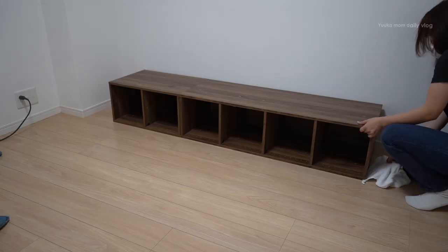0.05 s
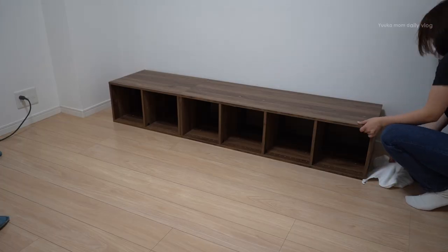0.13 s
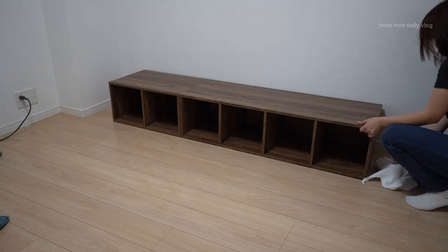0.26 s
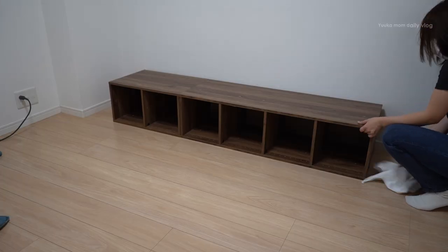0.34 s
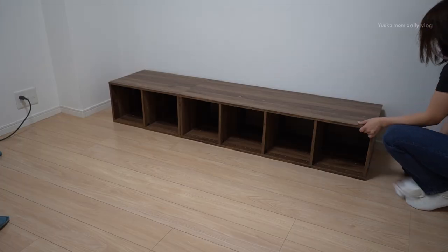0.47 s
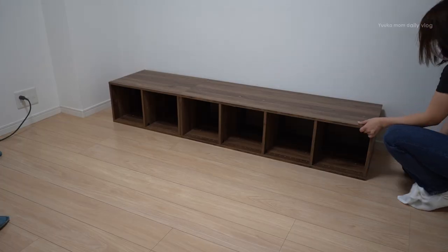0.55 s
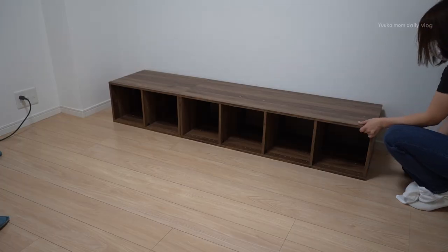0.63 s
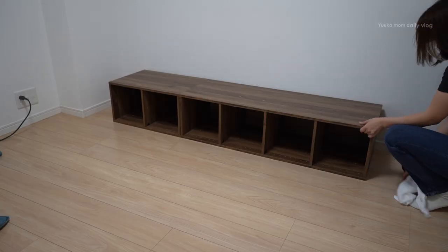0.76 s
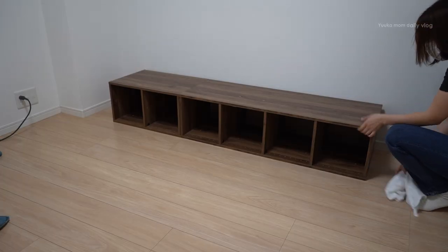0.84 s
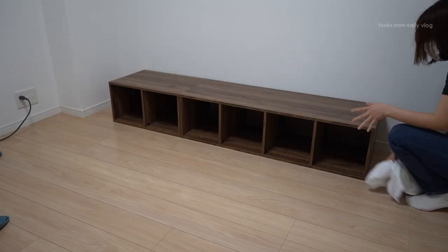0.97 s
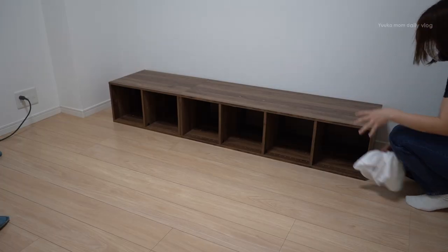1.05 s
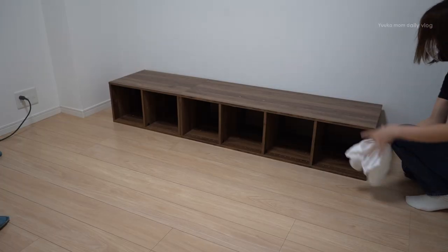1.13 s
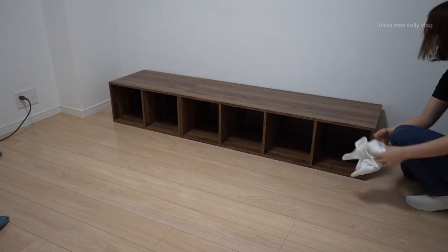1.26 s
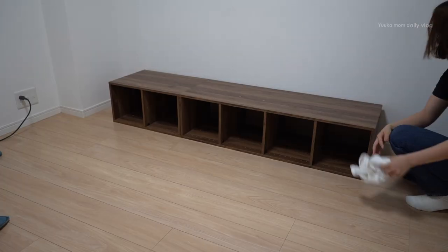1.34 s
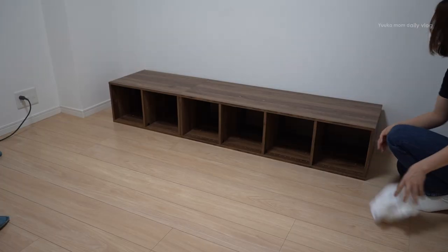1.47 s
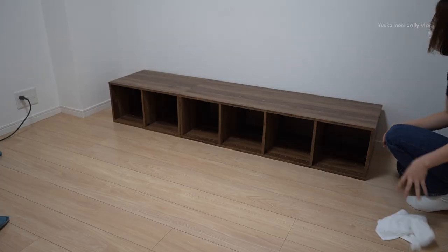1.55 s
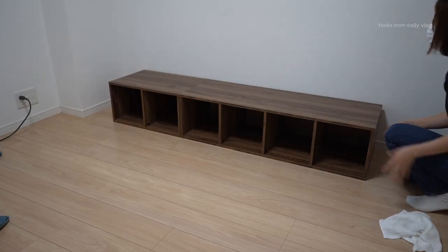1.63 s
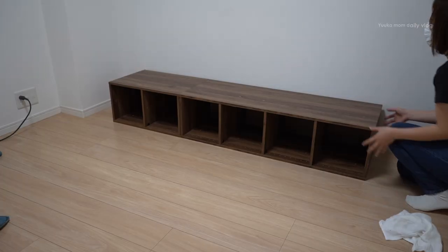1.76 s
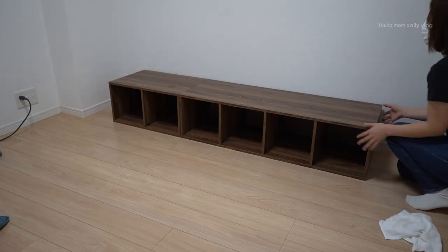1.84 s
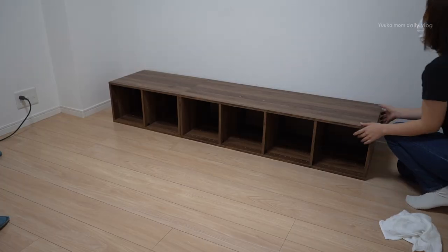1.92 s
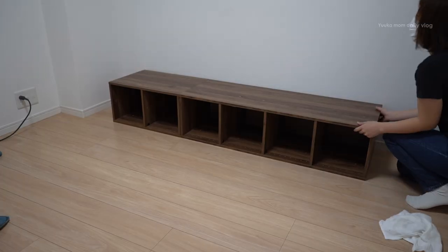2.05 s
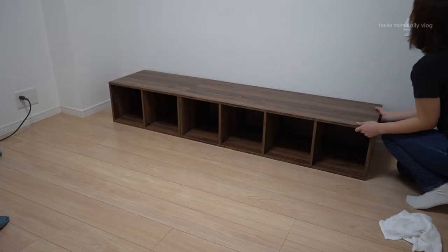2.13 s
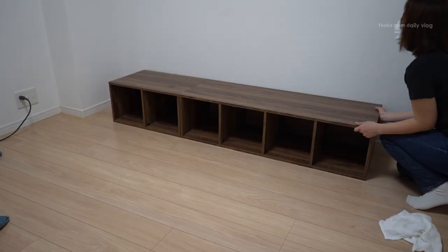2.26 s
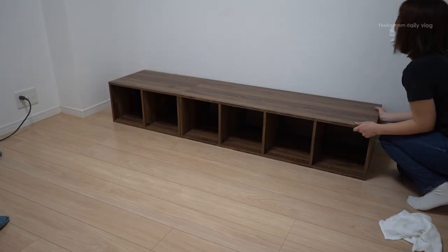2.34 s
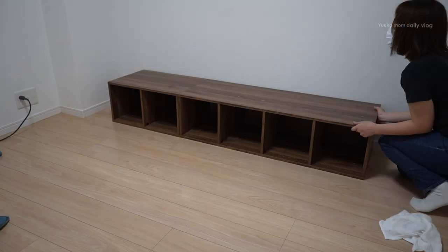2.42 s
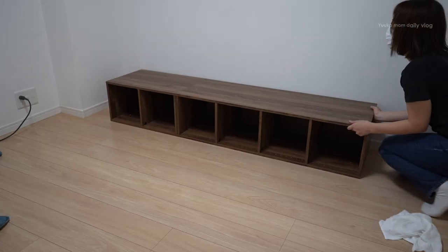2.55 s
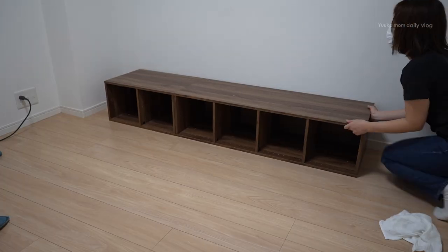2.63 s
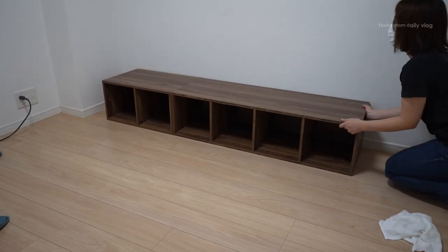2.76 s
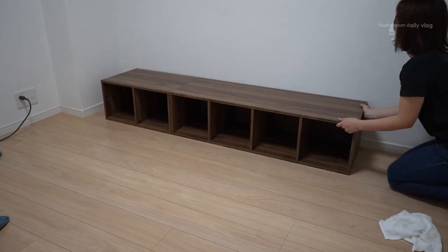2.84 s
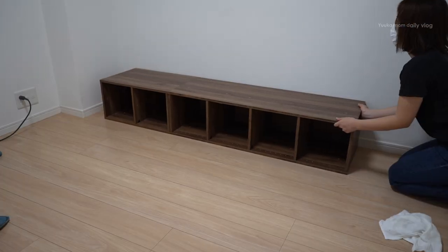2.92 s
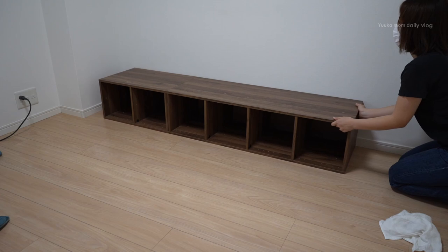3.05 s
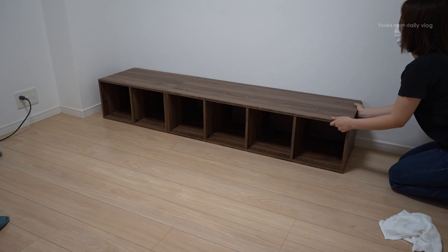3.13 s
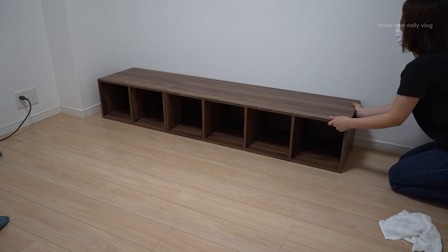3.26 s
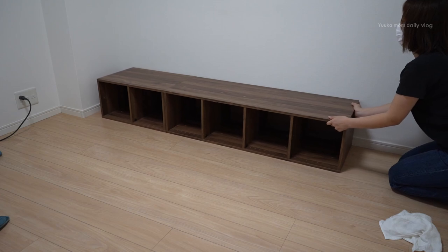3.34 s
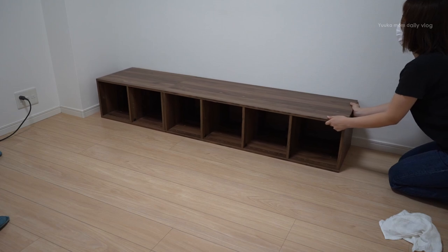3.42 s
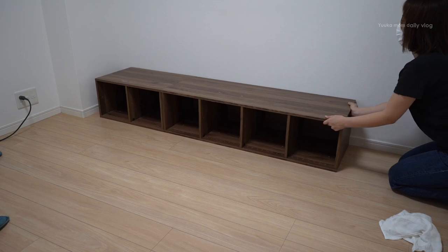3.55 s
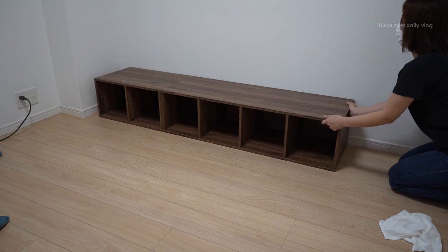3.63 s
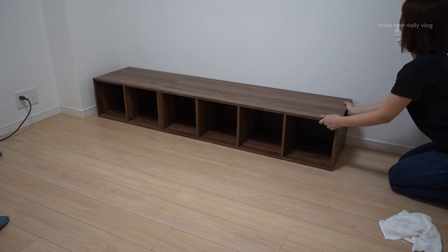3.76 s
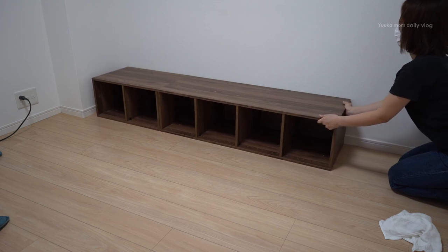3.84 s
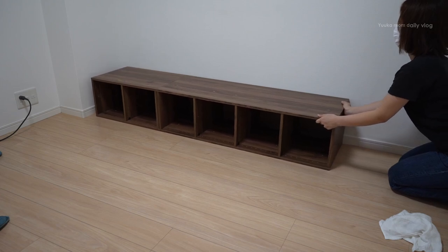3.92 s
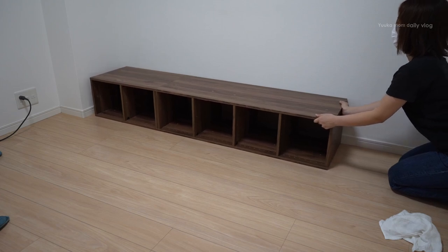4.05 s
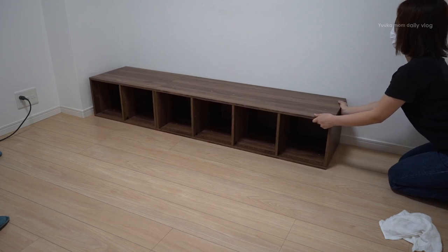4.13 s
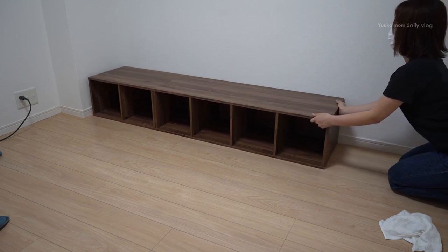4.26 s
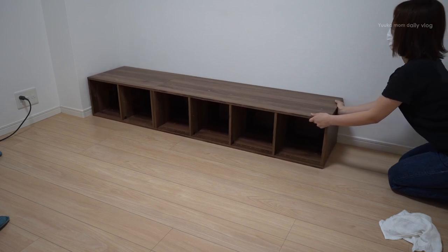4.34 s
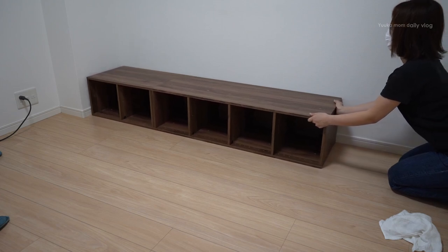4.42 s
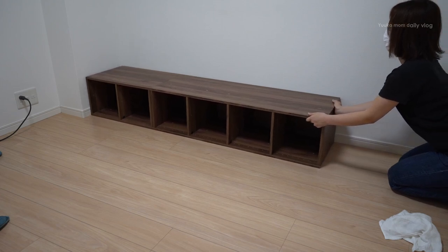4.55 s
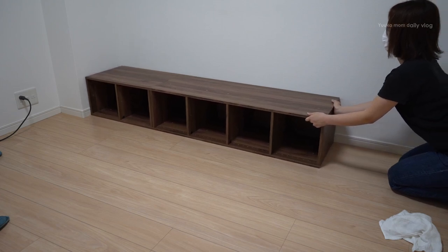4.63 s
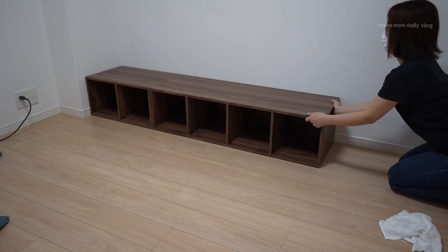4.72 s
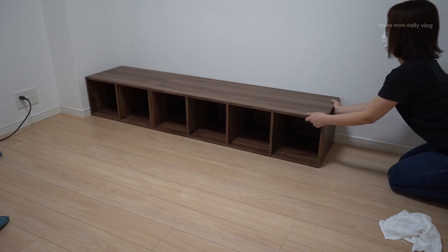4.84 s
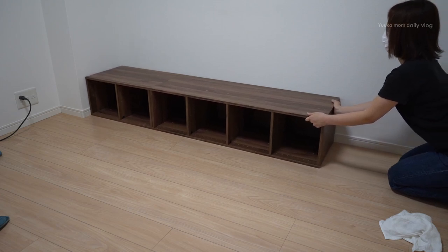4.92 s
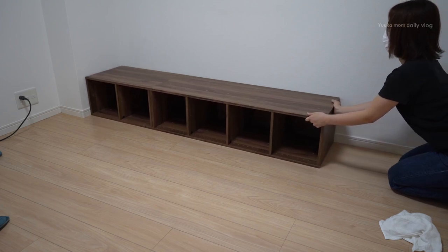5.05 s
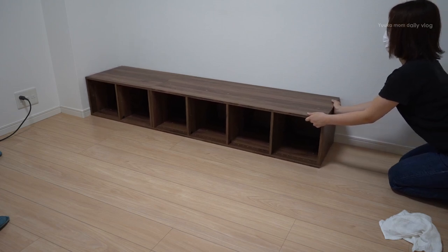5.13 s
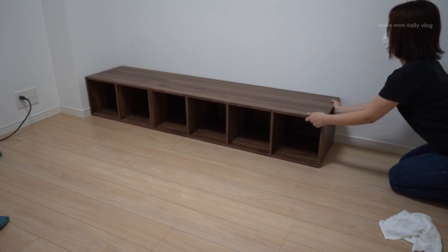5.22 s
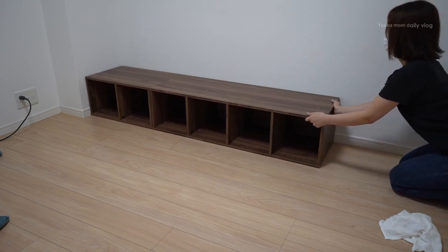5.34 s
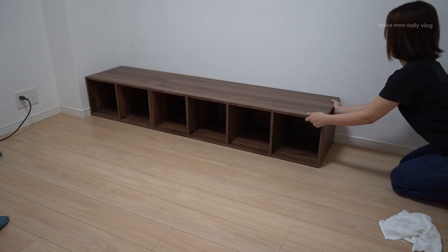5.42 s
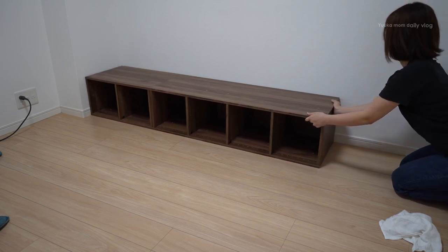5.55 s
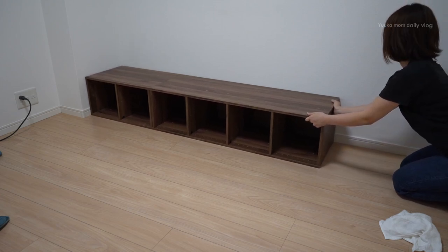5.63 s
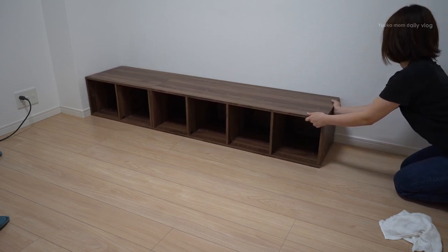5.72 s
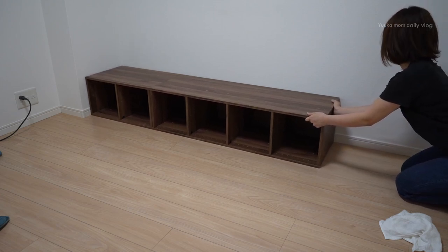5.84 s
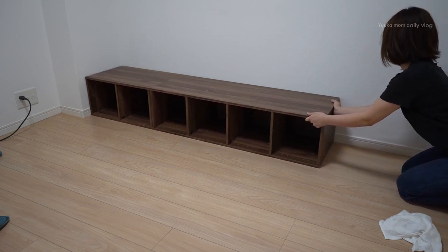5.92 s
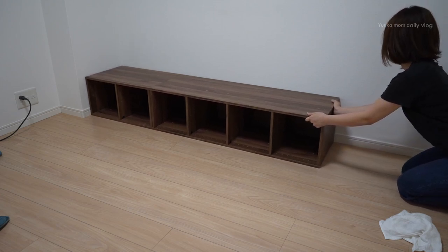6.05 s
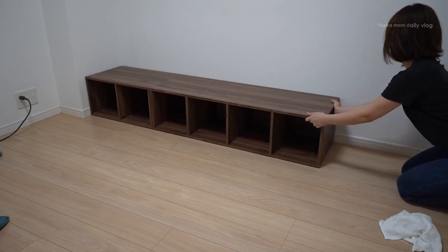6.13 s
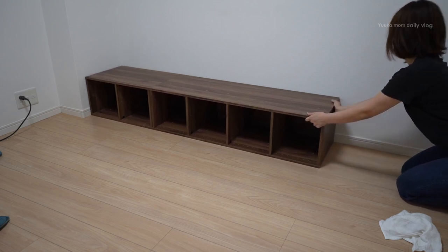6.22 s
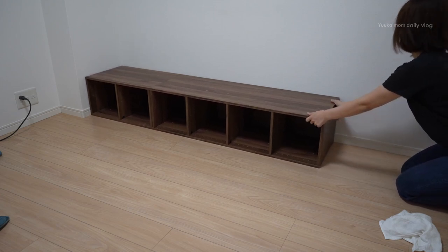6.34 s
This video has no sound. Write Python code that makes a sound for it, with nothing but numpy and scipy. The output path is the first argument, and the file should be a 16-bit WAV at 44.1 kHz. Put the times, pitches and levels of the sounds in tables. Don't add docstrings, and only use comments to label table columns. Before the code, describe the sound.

Close up in a bare, reverberant bedroom, cloth rustles and a wooden edge lightly taps the laminate. After more fabric shuffling, a firm knock starts a long gritty scrape, fast and bright at first, then slower, with panels humming and a knee thumping the floor. The shelf's end hits the skirting with a cluster of hollow knocks. A much quieter short push follows, with soft palm bumps and rustling.

```python
import sys
import numpy as np
from scipy import signal
from scipy.fft import rfft, irfft, next_fast_len
from scipy.io import wavfile
from scipy.ndimage import uniform_filter1d, map_coordinates

SR = 44100
rng = np.random.default_rng(int(sys.argv[2]) if len(sys.argv) > 2 else 0)


def bounce(signal):
    frames = np.transpose(np.atleast_2d(signal))
    limited = np.clip(frames, -1, 1)
    pcm = np.round(limited * 32767).astype(np.int16)
    wavfile.write(sys.argv[1], SR, pcm)


def invert_db(x):
    u = np.asarray(x, float) / 20
    return 10 ** u


N = 281358
TIME = np.arange(N) / SR
HZ = np.fft.rfftfreq(next_fast_len(N), 1 / SR) + 1

# (pitch [Hz], level [dB], t60 [s])
PANEL_MODES = [(120.7, -16.5, 0.73), (156.2, -0.5, 0.34), (176, -37, 0.33), (186.8, -11.5, 0.55),
               (214.8, 1, 0.23), (251, -7.5, 0.34), (286.5, -8, 0.31), (302, -6.5, 0.3), (342.2, -2, 0.32),
               (380, -9, 0.29), (456.5, -9.5, 0.34), (530, -10.5, 0.3), (598.5, -12, 0.28),
               (625, -13.5, 0.4), (664.4, -14, 0.29), (686.4, -10, 0.36), (701, -15.5, 0.63),
               (741, -13, 0.48), (801, -17.5, 0.24), (896, -25, 0.25), (1070, -23, 0.28)]
# (frequency [Hz], level [dB])
CLOTH_COLOUR = [(2000, -1), (4000, -1), (6500, -1), (9000, 0), (12000, -4), (16000, -7)]


def on_log(points, hz):
    f, v = np.transpose(points)
    return np.interp(np.log(hz), np.log(f), v)


def colour(x, gain):
    size = next_fast_len(N)
    return irfft(rfft(x, size) * gain, size)[..., :N]


def bump(hz, width, axis=HZ):
    return 1 / (1 + 1j * (axis - hz * hz / axis) / width)


def unit(x, lo_hz, hi_hz):
    return x / np.std(colour(x, (HZ > lo_hz) & (HZ < hi_hz)))


def walk(rate):
    hold = int(SR / rate)
    steps = np.repeat(rng.standard_normal(N // hold + 1), hold)
    return 1.1 * uniform_filter1d(uniform_filter1d(steps, hold), hold)[:N]


def grit(per_s, spread_db):
    where, sign, size = rng.random(N), rng.standard_normal(N), rng.random(N)
    rarest = 0.01
    heights = np.maximum(1 - size, rarest) ** (-spread_db * np.log(10) / 20)
    return (where < per_s / SR) * sign * heights


def hum(x, damping):
    gain = 0
    for k, (f, db, t60) in enumerate(PANEL_MODES):
        gain = gain + (-1) ** k * invert_db(db / 2) * bump(f, damping / min(t60, 0.5))
    return colour(x, gain)


def pushing(usual_db):
    # (time [s], level [dB])
    shove = [
        (2.31, -60.5),
        (2.48, -49),
        (2.69, -46.5),
        (2.89, -49.5),
        (3.22, -61.5),
        (3.36, -57),
        (3.8, -54.5),
        (4.42, -57.5),
        (4.61, -62),
    ]
    # (time [s], level [dB])
    nudge = [
        (5.13, -66),
        (5.18, -68.5),
        (5.46, -64),
        (5.86, -59.5),
        (5.96, -65),
        (6.03, -79),
    ]
    # (scrape [dB], panel hum [dB], extra sheen [dB])
    shove_load = (-52, -61.5, 0.0)
    nudge_load = (-68.5, -64.5, 8.4)
    scrape_follows, hum_follows = 0.1, 0.29
    grip_s = 0.059
    out = 0
    for push, (scrape_db, hum_db, sheen_db) in ((shove, shove_load), (nudge, nudge_load)):
        s, db = np.transpose(push)
        speed_db = np.interp(TIME, s, db)
        moving = uniform_filter1d(1.0 * ((TIME >= s[0]) & (TIME <= s[-1])), size=400)
        moving *= 1 - np.exp(-np.maximum(TIME - s[0], 0) / grip_s)
        faster_db = speed_db - usual_db
        levels_db = [speed_db, scrape_db + scrape_follows * faster_db,
                     hum_db + hum_follows * faster_db, faster_db + sheen_db]
        out = out + moving * invert_db(np.array(levels_db))
    return out


def slide(brighten=0.73, usual_db=-56):
    # (frequency [Hz], level [dB])
    hiss_colour = [(1500, -4.5), (3000, 3.5), (5000, 2.5), (7200, 2), (10000, -3), (13000, -9.5),
                   (16000, -12)]
    # (pitch [Hz], width [Hz], level [dB])
    edge_modes = [(933, 520, -6.5), (1594, 390, 1), (2207, 286, -1), (2630, 280, 0.5), (3330, 1530, -8.5)]
    hiss, edge, panel, sheen = pushing(usual_db)

    fine = unit(colour(grit(9000, 0.67), invert_db(on_log(hiss_colour, HZ))), 3740, 13400)
    top = colour(fine, 1 / (1 + (9000 / HZ) ** 4))
    fine += (np.maximum(sheen, 0.6) ** brighten - 1) * top

    through_edge = sum((-1) ** k * invert_db(db) * bump(f, w) for k, (f, w, db) in enumerate(edge_modes))
    scrape = unit(colour(grit(3000, 2.3), through_edge), 880, 3300)
    shaken = unit(hum(grit(2500, 3.3), damping=6.3), 110, 1030)
    return (hiss * invert_db(0.5 * walk(24.3)) * fine
            + edge * invert_db(0.7 * walk(30.3)) * scrape
            + panel * invert_db(0.44 * walk(21.8)) * shaken)


def crack(ms, spread_s=0.0029, size=2048):
    # (frequency [Hz], level [dB])
    wood_colour = [(250, 15), (500, 9.5), (1000, 10.5), (2000, 6), (4000, -5.5), (8000, -10), (16000, -11)]
    t, hz = TIME[:size], np.fft.rfftfreq(size, 1 / SR) + 1
    clicks = rfft(rng.standard_normal(size) * t * np.exp(-t / spread_s))
    dull = 1 + (hz * ms / 7000) ** 4
    out = irfft(clicks / np.abs(clicks) * invert_db(on_log(wood_colour, hz)) / dull)
    out *= (1 - np.exp(-1000 * t / (2.5 * ms))) * np.exp(-t / (9 * spread_s))
    return np.pad(out / np.std(out[:size // 8]), (0, SR // 3 - size))


def knocks(table, wide, ring_share, rise_s, held=0.42):
    out, t = np.zeros(N + SR), TIME[:SR // 3]
    f, mode_db, t60 = np.transpose(PANEL_MODES)[:, :, None]
    luck = rng.standard_normal((len(table), len(PANEL_MODES), 1))
    ring_s = ring_share * t60 * (held + (1 - held) / (1 + (f / 850) ** 4))
    fade = np.exp(-np.log(1000) * t / ring_s)
    fade *= 1 - np.exp(-(t * f / (200 * rise_s)) ** 2)
    modes = fade * np.sin(2 * np.pi * f * t)
    for (s, db, crack_db, hz, ms), g in zip(table, luck):
        near = wide + np.exp(-(np.log(f / hz) / 0.079) ** 2)
        soft = 1 / (1 + (f * ms / 1000) ** 2)
        ring = np.sum(invert_db(mode_db + 3.7 * g) * np.sign(g) * near * soft * modes, axis=0)
        ring *= np.minimum(1, 20 * (t[-1] - t))
        i = int(s * SR)
        out[i:i + len(t)] += invert_db(db) * (ring / np.abs(ring).max() + invert_db(crack_db + 4.5) * crack(ms))
    return out[:N]


def contacts():
    # (time [s], peak [dB], crack below peak [dB], favoured panel [Hz], contact [ms])
    skirting = [
        (4.615, -30.5, -10, 690, 0.5),
        (4.619, -30, -3.5, 335, 0.29),
        (4.621, -25, -26, 218, 0.32),
        (4.654, -25, -40, 189, 0.46),
        (4.689, -32, -13.5, 206, 0.33),
    ]
    edge_on_floor = [
        (0.371, -42, -11, 345, 1.2),
        (0.391, -41.5, -25, 360, 0.58),
        (0.416, -42.5, -17, 212, 0.54),
        (1.569, -58, -3, 162, 1.6),
        (2.207, -52.5, -7.5, 344, 0.48),
        (2.294, -36, -13.5, 238, 0.58),
    ]
    palms = [(0.134, -55.5, -44, 189, 3.1), (1.5, -74.5, 3, 189, 1.5), (5.019, -61.5, -4.5, 300, 1.1),
             (5.098, -63, -18, 332, 3.9), (5.167, -50, -13, 212, 1), (5.185, -45.5, -23, 189, 2),
             (5.264, -56, -10, 211, 4.8), (5.498, -54.5, -16, 181, 1.5), (5.575, -51, -29, 188, 3.2),
             (5.619, -50.5, -28, 177, 2), (5.665, -55, -16, 177, 3), (5.976, -56, -20, 364, 3.9),
             (6.139, -62, -10, 346, 3.2), (6.259, -60.5, -9, 336, 2.5)]
    return (knocks(skirting, wide=0.8, ring_share=0.67, rise_s=0.0032)
            + knocks(edge_on_floor, wide=0.47, ring_share=0.82, rise_s=0.008)
            + knocks(palms, wide=0.17, ring_share=0.77, rise_s=0.0081))


def swells(table):
    skew, roundness = 0.7, 1.3
    power = np.zeros((len(table[0]) - 2, N))
    for s, length, *db in table:
        span = slice(max(int(s * SR) + 1, 0), int((s + length) * SR))
        phase = ((TIME[span] - s) / length) ** skew
        hump = np.abs(np.sin(np.pi * phase)) ** roundness
        power[:, span] += (invert_db(np.array(db))[:, None] * hump) ** 2
    return np.sqrt(power)


def cloth():
    # (time [s], length [s], fine rustle [dB], coarse rustle [dB], shuffle [dB])
    strokes = [(-.1, 0.18, -63, -80, -90), (-.3, 1.4, -78, -84, -100), (.055, 0.16, -61.5, -69.5, -82),
               (.18, .13, -66.5, -66.5, -65), (.3, 0.13, -68.5, -62.5, -74), (.61, 0.064, -87, -71.5, -69),
               (.69, 0.11, -89, -69.5, -71), (.805, 0.17, -70.5, -71.5, -72.5), (1.04, 0.35, -72, -72, -78),
               (1.2, 0.48, -71.5, -78, -75.5), (1.47, 0.24, -92, -73, -67.5), (1.64, 0.31, -75, -72.5, -77),
               (1.86, 0.39, -72, -77, -78.5), (2.2, 0.16, -74, -78, -63.5), (5.01, 0.17, -81, -73.5, -64.5),
               (6.08, 0.13, -80, -75, -63.5), (6.2, 0.4, -77.5, -77, -69)]
    fine, coarse, shuffle = swells(strokes)
    fibres = unit(colour(grit(5000, 3.06), invert_db(on_log(CLOTH_COLOUR, HZ))), 4800, 11300)
    folds = unit(colour(grit(2500, 2.0), bump(1360, 440) - 0.44 * bump(2850, 1800)), 870, 4500)
    on_wood = unit(hum(grit(1500, 2.6), damping=15.0), 120, 960)
    return (fine * invert_db(0.51 * walk(35)) * fibres
            + coarse * invert_db(1.9 * walk(3.7)) * folds
            + shuffle * invert_db(0.45 * walk(28)) * on_wood)


def snaps(size=32768):
    # (time [s], peak [dB], centre [Hz], width [Hz], fall [ms])
    slips = [(.352, -55, 8900, 5400, 31), (0.633, -59, 4920, 3704, 6.8), (0.708, -58, 3000, 2100, 15),
             (.805, -47, 5640, 1500, 16), (0.808, -53, 2570, 1200, 29), (1.29, -58.5, 4860, 3500, 120),
             (1.571, -57.5, 1544, 380, 170), (1.75, -60, 9260, 4320, 36), (2.294, -66, 3200, 1380, 1.3),
             (2.654, -56, 446, 22, 300), (5.021, -57, 7000, 6480, 9.3), (5.19, -56, 12200, 4320, 91),
             (6.12, -65, 7900, 5000, 20), (2.293, -59, 13000, 5000, 48), (1.58, -59, 523, 260, 150)]
    rise_share = 0.059
    out, t, axis = np.zeros(N + size), TIME[:size], np.fft.rfftfreq(size, 1 / SR) + 1
    for s, db, hz, width, fall_ms in slips:
        tint = np.abs(bump(hz, width, axis)) ** 1.45
        tint += 0.12 * np.sqrt(width / 3000) * invert_db(on_log(CLOTH_COLOUR, axis))
        burst = irfft(rfft(rng.standard_normal(size)) * tint)
        fade = (1 - np.exp(-1000 * t / (rise_share * fall_ms))) * np.exp(-1000 * t / fall_ms)
        i = int(s * SR)
        out[i:i + size] += invert_db(db - 4.5) * fade * burst / np.std(burst)
    return out[:N]


def boards():
    # (time [s], length [s], level [dB])
    shifts = [(0.0, 0.4, -70), (.32, 0.29, -68), (.65, 0.16, -79), (.78, .15, -74), (1.16, 0.18, -82),
              (1.52, .25, -72), (1.82, 0.6, -73.5), (2.26, 0.66, -72), (2.86, 0.18, -55.5),
              (3.05, 0.76, -70.5), (3.55, .8, -72.5), (4.38, 0.28, -68), (4.7, 0.51, -75),
              (5.13, 0.15, -74), (5.5, 0.6, -75), (6.1, 0.25, -72)]
    # (time [s], peak [dB], main pitch [Hz], t60 [s])
    knees = [
        (2.331, -69, 50, 0.37),
        (2.865, -48.5, 34, 0.082),
        (2.931, -65, 54.7, 0.53),
        (2.989, -59, 50, 0.15),
        (3.349, -65, 48, 0.41),
        (4.617, -54, 63, 0.18),
    ]
    flex = colour(rng.standard_normal(N), bump(63, 21) + 0.5 * bump(32, 25))
    flex = unit(colour(flex, 1 / (1 + (HZ / 105) ** 6)), 20, 115)
    out = np.hypot(swells(shifts)[0], invert_db(-78.5)) * flex
    for s, db, hz, t60 in knees:
        t = np.maximum(TIME - s, 0)
        swing = np.sin(2 * np.pi * hz * t) + 0.5 * np.sin(2 * np.pi * 99 * t) * invert_db(-60 * t / 0.18)
        out += invert_db(db + 12) * swing * (1 - np.exp(-t / 0.0023)) * invert_db(-60 * t / t60)
    return out


def walls(gap_s=0.0014):
    # (frequency [Hz], t60 [s])
    decay = [(60, 0.067), (125, 0.38), (250, 0.41), (500, 0.48), (1000, 0.58), (2000, 0.4), (4000, 0.38),
             (8000, 0.4), (14000, 0.18)]
    t, hz = TIME[:SR], np.fft.rfftfreq(SR, 1 / SR) + 1
    tails, noise = np.zeros((2, SR)), rfft(rng.standard_normal((2, SR)))
    for centre in 45 * 2 ** np.arange(0, 9, 0.5):
        inside = np.exp(-(np.log2(hz / centre) / 0.52) ** 2)
        part = irfft(noise * inside) * invert_db(-60 * t / on_log(decay, centre))
        part *= 1 - np.exp(-(t / gap_s) ** 2)
        energy = np.sum(part ** 2, axis=1, keepdims=True)
        tails += part * np.sqrt(np.mean(inside ** 2) / energy) / np.sqrt(2)
    return tails


def reflections(tails, spots, direct_db):
    tails = tails + invert_db(direct_db) * signal.unit_impulse(tails.shape)
    for _ in range(2):
        spectrum = rfft(tails)
        tails = irfft(spectrum / np.sqrt(uniform_filter1d(np.abs(spectrum) ** 2, size=240 // spots)))
        tails[:, SR // 2:] = 0
    return tails


def pair(mid, side):
    # (frequency [Hz], side minus mid [dB])
    spread = [(60, -1), (110, -30), (200, -20.5), (380, -14), (700, -6.5), (1290, -5), (2380, -0.5),
              (4400, 2.5), (8120, 0), (15000, 2)]
    # (frequency [Hz], left minus right [dB])
    balance = [(60, -8), (110, -2.5), (200, 0.0), (380, -0.5), (700, -2), (1290, -1), (2380, -1.5),
               (4400, 0), (8120, -4.5), (15000, 1.5)]
    side = colour(side, invert_db(on_log(spread, HZ)))
    lean = invert_db(on_log(balance, HZ) / 2)
    return np.array([colour(mid + side, lean), colour(mid - side, 1 / lean)])


def room(x, responses, modal_hz=700, drift_ms=0.25):
    size = next_fast_len(N + SR)
    hz = np.fft.rfftfreq(size, 1 / SR) + 1
    paths = rfft(responses, size)
    modal = 1 / (1 + (hz / modal_hz) ** 4)
    paths[0] = modal + np.sqrt(1 - modal ** 2) * paths[0]
    moved = map_coordinates(x, [np.arange(N) + drift_ms * SR / 1000 * walk(5.5)], order=1)
    heard = rfft(np.array([x, moved]), size) * paths / (1 + (105 / hz) ** 6)
    mid, side = irfft(heard, size)[:, :N]
    return pair(mid, side)


def quiet():
    # (frequency [Hz], level [dB])
    air_colour = [(15, -52), (25, -21), (193, 4), (267, 1), (359, 5.5), (722, -5.5), (1170, -8),
                  (1340, -20), (1750, -6.5), (4380, -20.5), (15500, -20)]
    mid, side = (colour(rng.standard_normal(N), invert_db(on_log(air_colour, HZ))) for _ in range(2))
    scale = invert_db(-70 + walk(3.31)) / np.std(colour(mid, HZ > 100))
    return scale * pair(mid, side)


def scene():
    tails = walls()
    rubbing = room(slide() + cloth(), reflections(tails, spots=20, direct_db=-8))
    hits = room(contacts() + snaps(), reflections(tails, spots=9, direct_db=-2))
    return rubbing + hits + boards() + quiet()


def band_limit(x):
    return signal.sosfilt(signal.butter(12, 15770, fs=SR, output="sos"), x)


def record(dry):
    top = signal.ellip(8, 0.2, 60, 15750, fs=SR, output="sos")
    return band_limit(signal.sosfilt(top, dry))


dry = scene()
out = record(dry)
bounce(out)
```